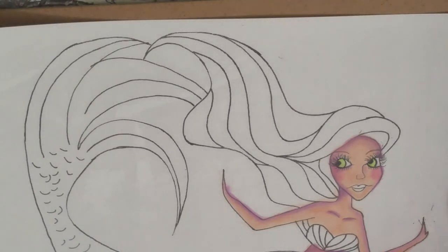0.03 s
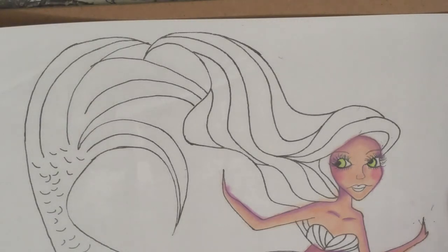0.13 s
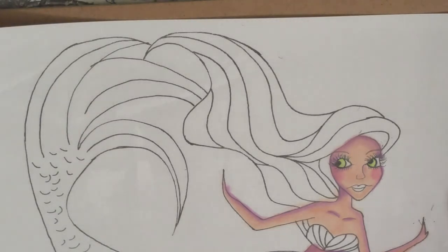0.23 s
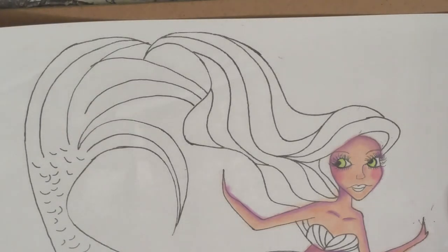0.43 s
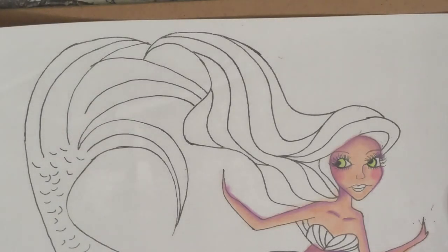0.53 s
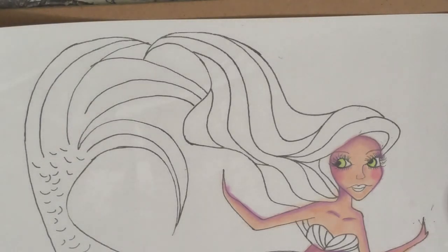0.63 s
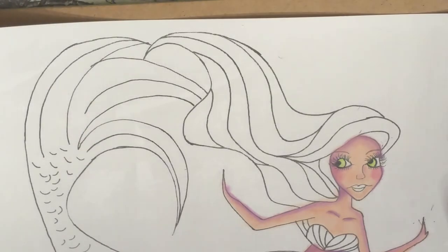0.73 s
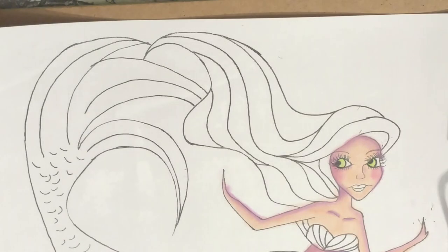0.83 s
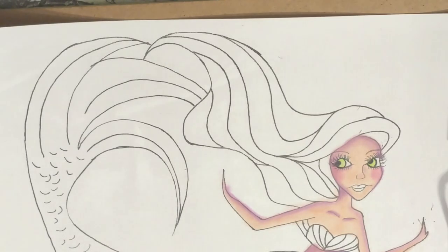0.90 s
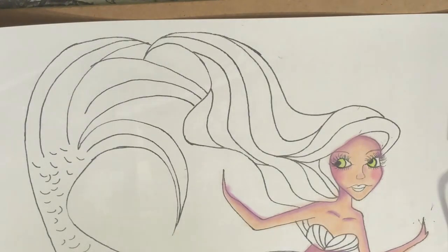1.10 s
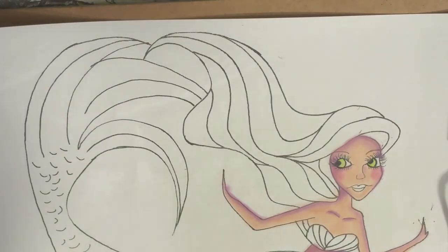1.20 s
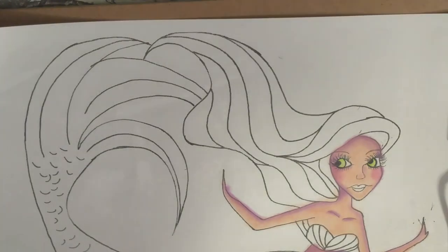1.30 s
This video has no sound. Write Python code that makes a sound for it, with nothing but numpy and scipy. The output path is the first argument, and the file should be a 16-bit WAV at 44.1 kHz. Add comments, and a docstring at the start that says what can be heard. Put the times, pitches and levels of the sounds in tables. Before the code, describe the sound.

A small glass jar rings from a knock just before, then a thin wooden handle taps it three times, the last two close together, each with a short bright ring; small quiet room, close stereo microphone.

```python
"""A small glass water jar rings as a paintbrush handle knocks it at different places round its wall,
close to a stereo microphone. Decaying sine modes make the ring, some in near pairs that beat.
Noise bursts with a short buzz make the cracks; low modes and rough noise make the table thuds.
A small room answers with decaying noise. Under it lie filtered-noise rumble and microphone hiss,
with faint band-noise ticks and rustles of the hand."""
import sys
import numpy as np
from scipy import signal
from scipy.fft import rfft, irfft
from scipy.io import wavfile

SR = 44100
rng = np.random.default_rng(int(sys.argv[2]) if len(sys.argv) > 2 else 0)


def bounce(signal):
    """Save signal as a 16-bit WAV file at the path given by the first command-line argument."""
    frames = np.transpose(np.atleast_2d(signal))
    limited = np.clip(frames, -1, 1)
    pcm = np.round(limited * 32767).astype(np.int16)
    wavfile.write(sys.argv[1], SR, pcm)


def level_to_linear(level):
    """Convert decibel levels to linear amplitude factors, elementwise."""
    exponent = np.asarray(level, float) / 20
    return 10 ** exponent


N = 59535
T = np.arange(N) / SR
BIN_HZ = np.arange(N // 2 + 1) * SR / N


def curve(table, hz):
    """Reads a (f/Hz, value) table along a log-frequency axis."""
    f, value = np.array(table).T
    return np.interp(np.log(hz + 1e-9), np.log(f), value)


def colour(x, table):
    """Shapes noise by a (f/Hz, level/dB) spectrum and scales it to rms 1."""
    y = irfft(rfft(x) * level_to_linear(curve(table, BIN_HZ)), N)
    return y / np.sqrt(np.mean(y ** 2))


def fade(at_s, decay_s, rise_s):
    """Envelope that rises at at_s and dies exponentially."""
    t = np.maximum(T - at_s, 0)
    return (1 - np.exp(-t / rise_s)) * np.exp(-t / decay_s)


# Knocks on the jar; the first falls before the start, so only its tail is heard:
# t/s, strength/dB, place round the wall/deg, contact/s
KNOCKS = [(-0.22, -2, 0, .001), (0.2282, 0, 0, .0045), (0.4978, 2, 15, .00005), (0.6355, 2, 95, .00083)]
# Ringing modes of the jar: f/Hz, level/dB at an antinode for a 0 dB knock, t60/s,
# lobes round the wall, antinode/deg, left over right/dB, left phase lead/rad
JAR_MODES = [(2328.1, -29.2, 0.41, 2, 69.5, 8.5, -2.9), (2358.9, -14.4, 0.42, 2, 142.0, 2.2, -1.88),
             (3180.0, -46.0, 0.12, 1, 144.0, 5.4, -0.33), (3778.0, -30.4, 0.175, 6, 13.7, 11.4, 0.56),
             (4252.0, -41.4, 0.14, 6, 43.7, -2.6, -0.74), (4644.0, -28.5, 0.21, 3, 72, -6.7, 0.34),
             (4683.3, -15.5, 0.196, 3, 17.1, 1.0, 1.52), (5010.0, -36.8, 0.12, 3, 21.3, -5.6, 2.72),
             (5580.0, -44.7, 0.18, 3, 97.3, 5.7, -0.83), (5900.0, -45, 0.12, 3, 20, 1.6, 0.4),
             (6785.0, -34.8, 0.07, 6, 7.0, 11.7, -2.4), (7788.5, -25.3, 0.171, 4, 24.8, 1.1, 2.0),
             (7817, -23.8, 0.151, 4, 1.2, 0.8, 2.11), (9250.0, -35.8, 0.11, 1, 276.0, 9.2, 1.17),
             (9364.0, -32.7, 0.12, 5, 20.8, -1.0, 0.91), (9636.0, -34.1, 0.1, 3, 92.0, 3.8, 1.76),
             (9750.0, -34.5, 0.1, 2, 5.0, 3.2, 2.93), (10022.0, -31.2, 0.115, 5, 55.2, -4.3, -1.0),
             (10140.0, -30.8, 0.1, 1, 224.0, 1.4, -1.92), (11660.0, -48.2, 0.09, 3, 34.7, 1.4, -2.22),
             (12480.0, -53.9, 0.09, 2, 1.0, 0.2, 1.37), (13408.0, -31.3, 0.09, 1, 276.0, -4.5, -1.29),
             (13630.0, -26.4, 0.085, 2, 146.0, 8.9, -0.85), (14362.0, -28.1, 0.085, 1, 277, 3.0, 0.57),
             (15360.0, -28.6, 0.08, 1, 260.0, 6.4, -2.62)]


def jar():
    """Each knock drives each mode by its shape at that place; phase counts from when the handle lets go."""
    out = np.zeros((2, N))
    for hz, db, t60, lobes, antinode_deg, pan_db, lead in JAR_MODES:
        # half the level and phase offset goes to each ear
        side = level_to_linear(pan_db / 2) * np.exp(.5j * lead)
        for at, knock_db, place_deg, contact in KNOCKS:
            shape = np.cos(lobes * np.radians(place_deg - antinode_deg))
            envelope = fade(at, t60 / np.log(1000), rise_s=.001)
            phase = 2 * np.pi * hz * (T - at - contact)
            ring = level_to_linear(db + knock_db) * shape * envelope * np.exp(1j * phase)
            out += np.array([(ring * side).imag, (ring / side).imag])
    return out


# Spectrum of the steady background noise: f/Hz, relative level/dB
AIR_TONE = [(15, -52.5), (25, -25), (97, -4), (200, -18.5), (236, -25.5), (270, -18.5), (301, -17),
            (427, -18), (734, -26), (863, -25.5), (9070, -37), (16000, -33)]
# Likeness of the background at the two ears: f/Hz, correlation 0-1
ALIKE = [(60, .9), (130, .8), (290, .4), (640, .2), (1400, .01)]
# Swell of the low rumble: t/s, level/dB on the scale of hiss_db
RUMBLE = [(0.0, -69), (0.15, -62.5), (0.352, -62.5), (0.62, -64), (0.758, -63.5), (0.962, -70),
          (1.172, -67), (1.35, -65)]


def air():
    """Noise whose lows swell slowly and are alike at both ears, under steady hiss."""
    hiss_db, rumble_top_hz = -68, 900
    alike = curve(ALIKE, BIN_HZ)
    mid, side = rfft(rng.standard_normal((2, N)))
    # weighting mid against side sets the correlation between the ears
    mid = mid * np.sqrt(1 + alike)
    side = side * np.sqrt(1 - alike)
    stereo = irfft(np.array([mid + side, mid - side]), N)
    # the root of 2 puts each channel 3 dB above hiss_db
    noise = level_to_linear(hiss_db) * np.sqrt(2) * colour(stereo, AIR_TONE)
    low = irfft(rfft(noise) / (1 + (BIN_HZ / rumble_top_hz) ** 2), N)
    swell_db = np.interp(T, *np.array(RUMBLE).T)
    # noise already holds one share of low, hence the minus 1
    return noise + low * (level_to_linear(swell_db - hiss_db) - 1)


def room(dry):
    """Reflections as a dense, dull, quickly dying noise echo, different at each ear."""
    level_db, t60_s, delay_s, top_hz = -22, .15, .003, 5870
    echo = colour(rng.standard_normal((2, N)), [(top_hz, 0), (16000, -10)])
    echo = echo * fade(delay_s, t60_s / np.log(1000), rise_s=.004)
    # level_db is the echo's energy, averaged over the ears
    energy = np.mean(np.sum(echo ** 2, axis=1))
    echo = echo * level_to_linear(level_db) / np.sqrt(energy)
    return signal.fftconvolve(dry, echo, axes=1)[:, :N]


# Small ticks and rustles: t/s, level/dB, centre f/Hz, width/Hz, decay/s
TICKS = [(.041, -54.5, 6670, 900, 0.0024), (.144, -64.5, 11900, 7000, 0.0022),
         (1.263, -65.5, 12820, 5000, .015)]


def ticks():
    """Hand movement as faint bursts of band noise, each rising in a quarter of its decay time."""
    out = 0
    for at, db, hz, width, decay in TICKS:
        band = [(hz - width, -30), (hz - width / 2, 0), (hz + width / 2, 0), (hz + width, -30)]
        noise = colour(rng.standard_normal((2, N)), band)
        out = out + level_to_linear(db) * fade(at, decay, decay / 4) * noise
    return out


# Contact noise of the knocks: t/s, level/dB, brightness/(dB per octave)
CRACKS = [(0.2288, -20.5, 1.5), (0.4978, -16.5, 2), (.6354, -18.5, 1)]
# Crack spectrum before the brightness tilt: f/Hz, relative level/dB
CRACK_TONE = [(180, -71), (300, -50), (2130, -10.5), (3240, -7.5), (4690, -4), (5930, -7.5), (9810, -13),
              (11000, -19.5), (14900, -7.5), (16500, -28)]


def cracks():
    """Wood on glass: a sharp noise burst, then the handle buzzes on; each knock has its own brightness."""
    rattle_db = -18.5  # against the crack
    chatter_db, chatter_hz = 5, 400  # spread and rate of the buzz's uneven level
    out = 0
    for at, db, tilt_db in CRACKS:
        tone = [(hz, level + tilt_db * np.log2(hz / 4000)) for hz, level in CRACK_TONE]
        mid, side = colour(rng.standard_normal((2, N)), tone)
        jumps = rng.standard_normal(int(N / SR * chatter_hz) + 2)
        chatter = level_to_linear(chatter_db * np.interp(T * chatter_hz, np.arange(len(jumps)), jumps))
        burst = fade(at, decay_s=.0023, rise_s=.00077)
        buzz = level_to_linear(rattle_db) * chatter * fade(at, decay_s=.011, rise_s=.006)
        out = out + level_to_linear(db) * (burst + buzz) * np.array([mid + side, mid - side])
    return out


# Blows passed on to the table: t/s, level/dB
THUDS = [(.229, -44.5), (.498, -50.5), (.636, -52)]
# Modes of the table top: f/Hz, level/dB against the blow, t60/s
TABLE_MODES = [(230.6, -5.5, 0.18), (393, -1.5, 0.075), (670, -3.5, 0.044), (1032, -5, .06)]


def thuds():
    """The table top rings in low decaying sines and shudders in rough noise after each blow."""
    ring, shudder = 0, 0
    for at, db in THUDS:
        for hz, mode_db, t60 in TABLE_MODES:
            envelope = fade(at, t60 / np.log(1000), rise_s=.0021)
            ring = ring + level_to_linear(db + mode_db) * envelope * np.sin(2 * np.pi * hz * (T - at))
        shudder = shudder + level_to_linear(db) * fade(at, decay_s=.022, rise_s=.0071)
    rough = colour(rng.standard_normal((2, N)), [(150, -21.5), (400, -2), (1200, -9), (2500, -21)])
    return ring + level_to_linear(-1) * rough * shudder


def scene():
    """Jar, cracks and thuds in the room, over ticks and background."""
    dry = jar() + cracks() + thuds()
    return dry + room(dry) + ticks() + air()


def roll_off(x):
    """The treble ends steeply here."""
    return signal.sosfilt(signal.butter(12, 16900, fs=SR, output="sos"), x)


def record(dry):
    """The recorder cuts the top with a steep low-pass at 15.8 kHz."""
    low_pass = signal.ellip(8, .3, 60, 15800, fs=SR, output="sos")
    mix = signal.sosfilt(low_pass, dry)
    return roll_off(mix)


dry = scene()
out = record(dry)
bounce(out)
```